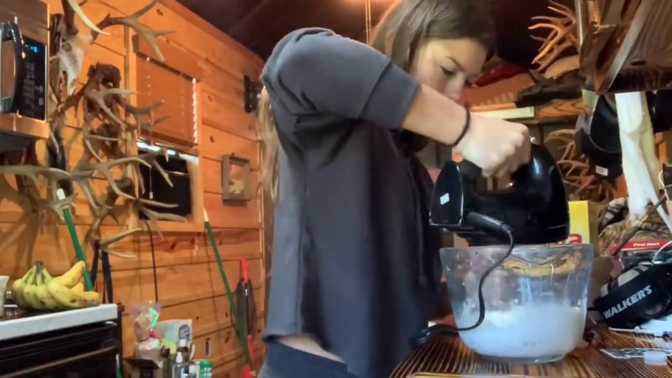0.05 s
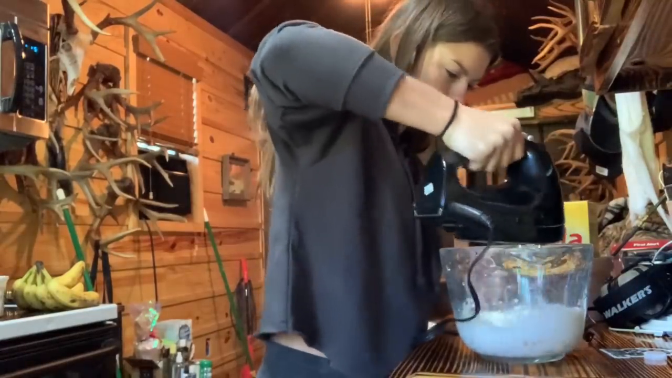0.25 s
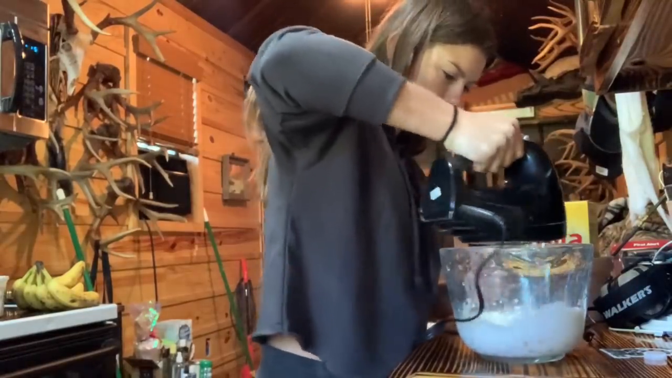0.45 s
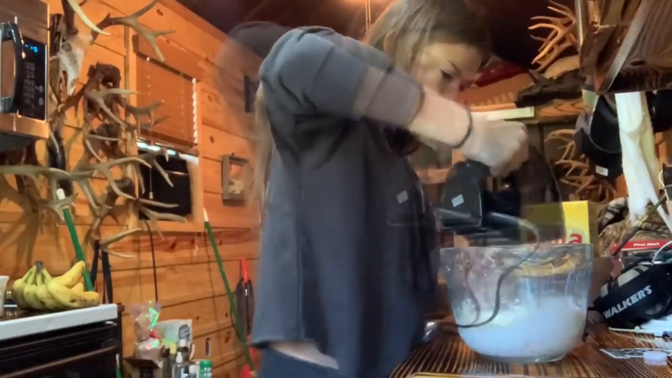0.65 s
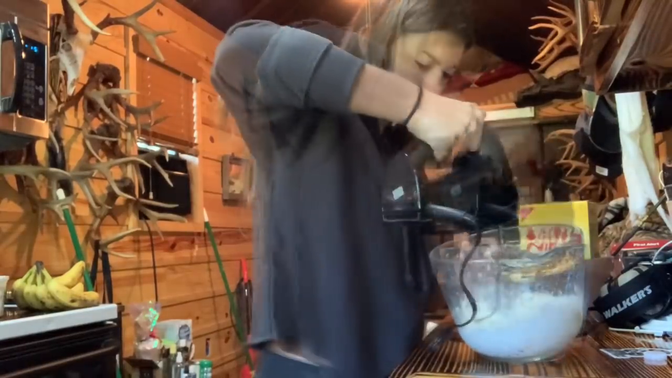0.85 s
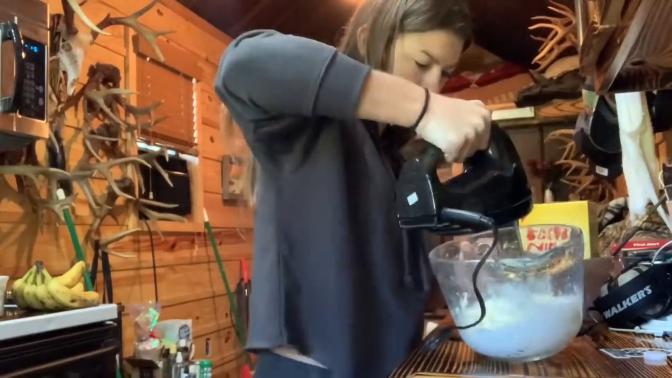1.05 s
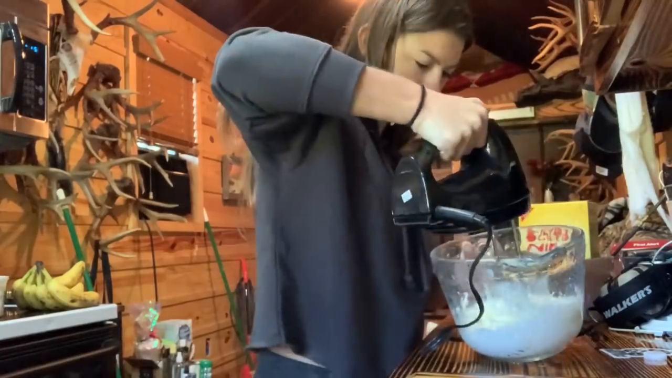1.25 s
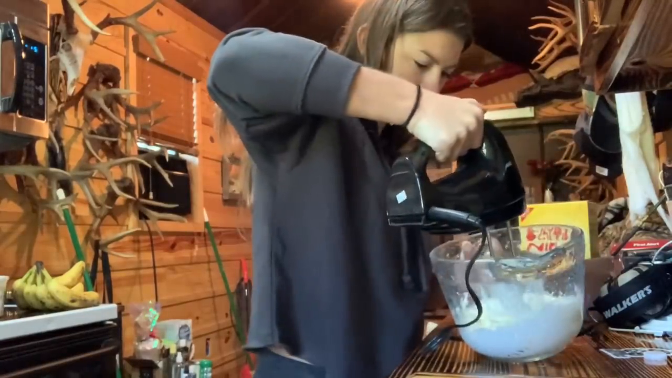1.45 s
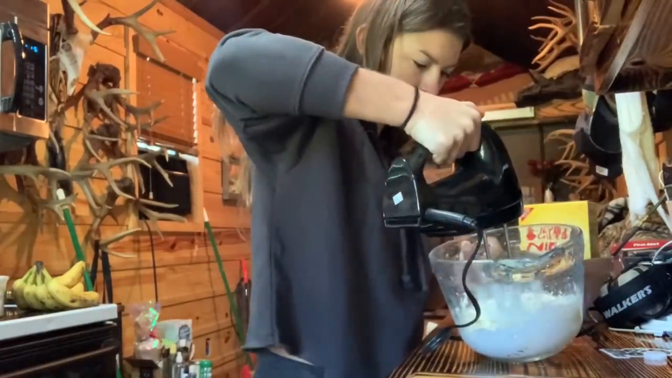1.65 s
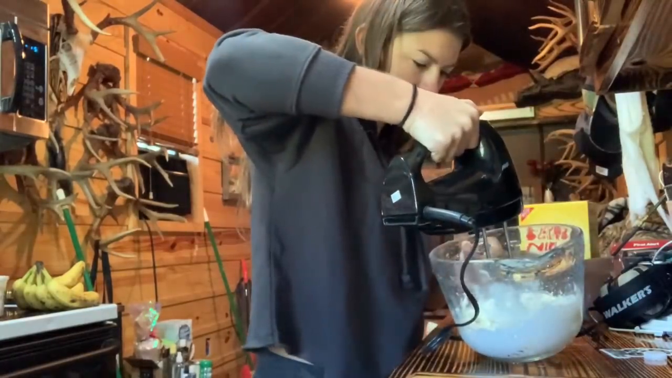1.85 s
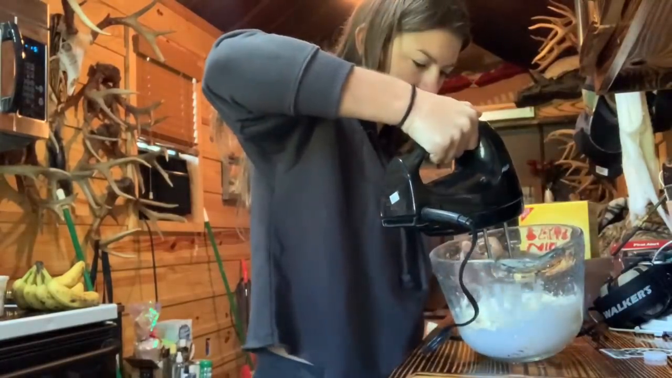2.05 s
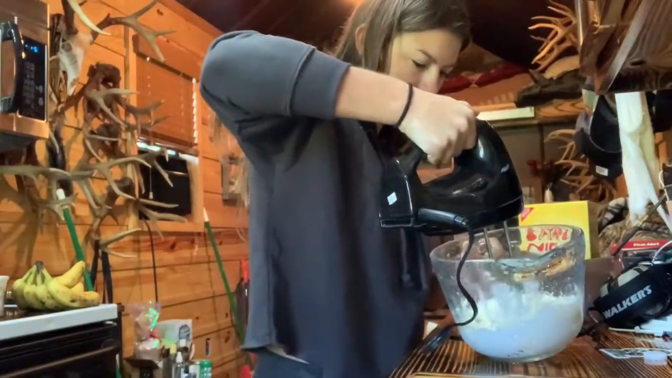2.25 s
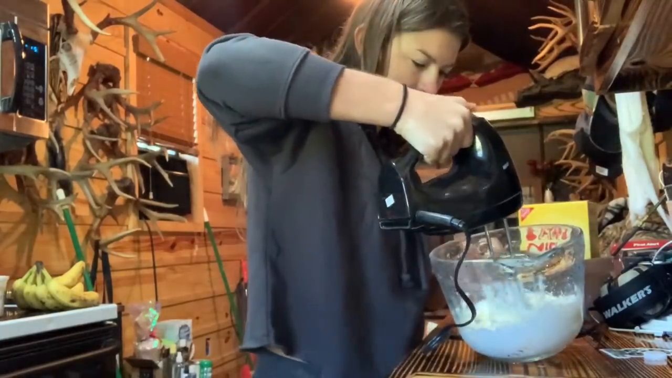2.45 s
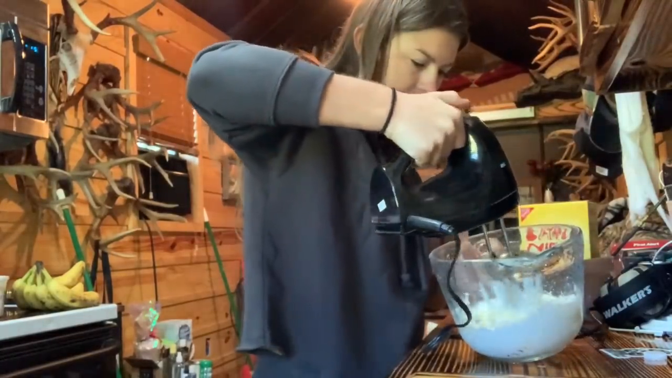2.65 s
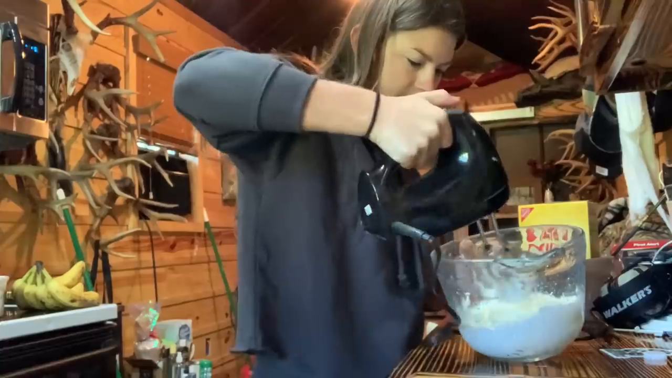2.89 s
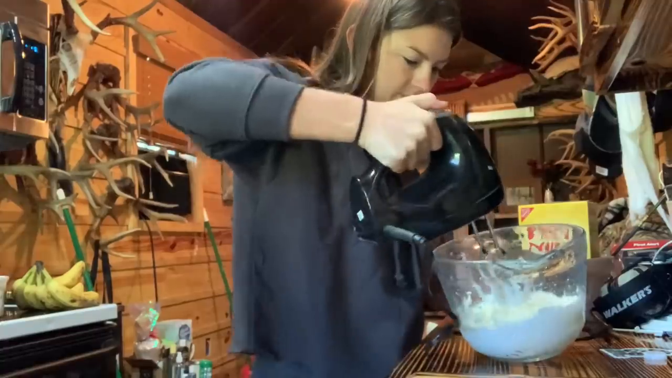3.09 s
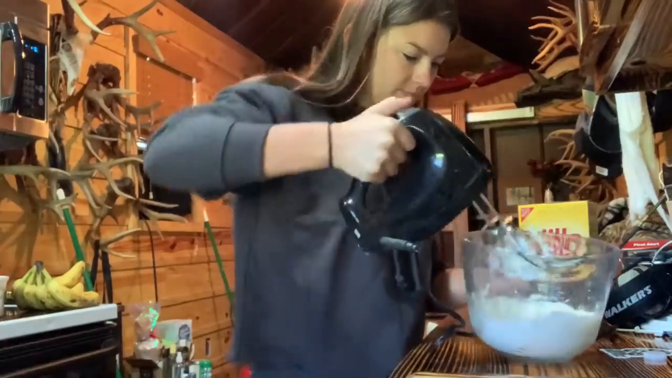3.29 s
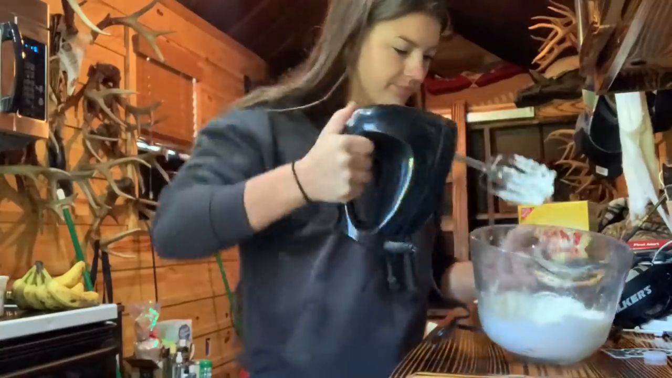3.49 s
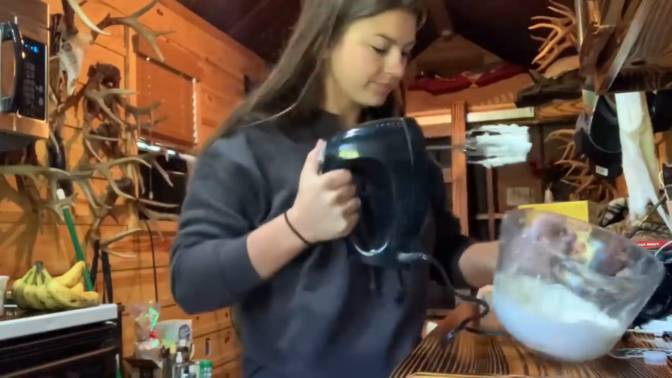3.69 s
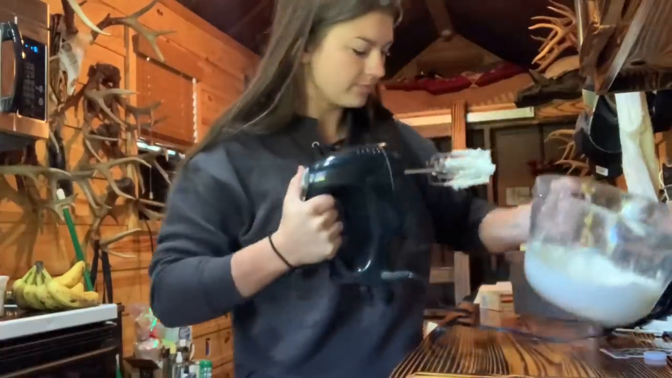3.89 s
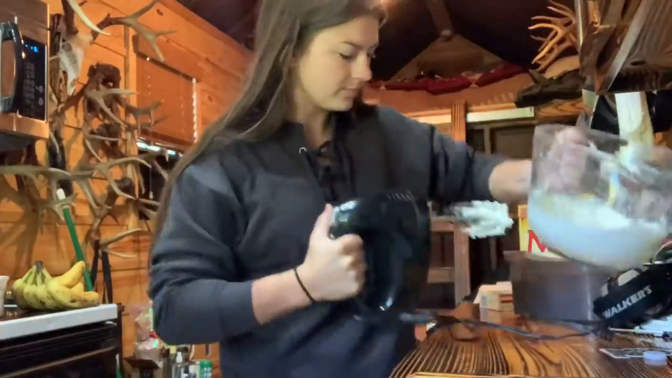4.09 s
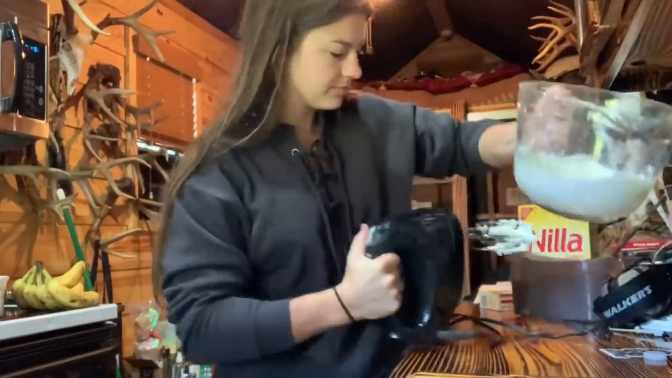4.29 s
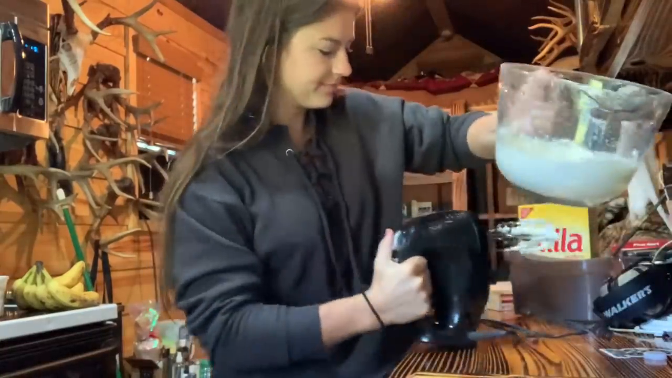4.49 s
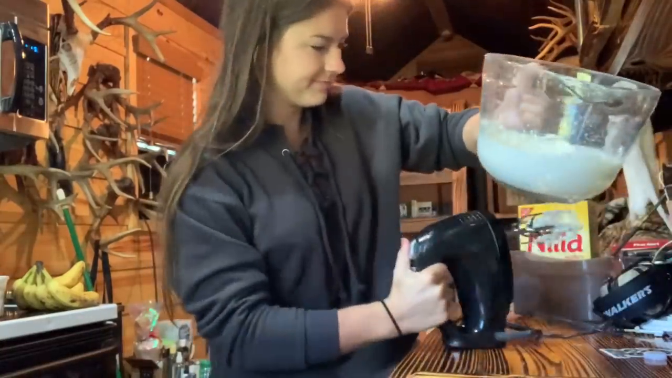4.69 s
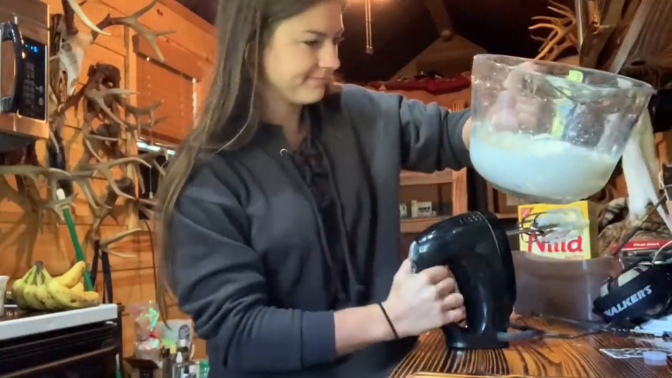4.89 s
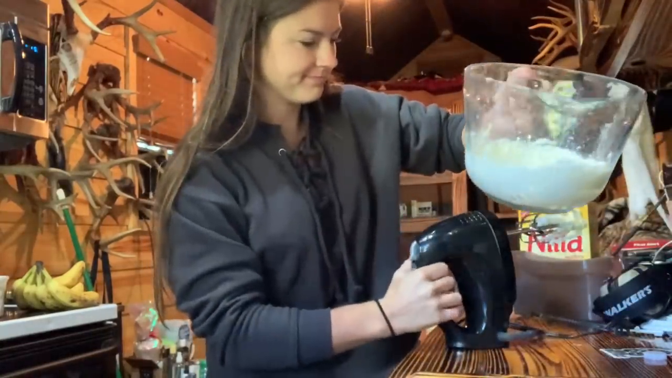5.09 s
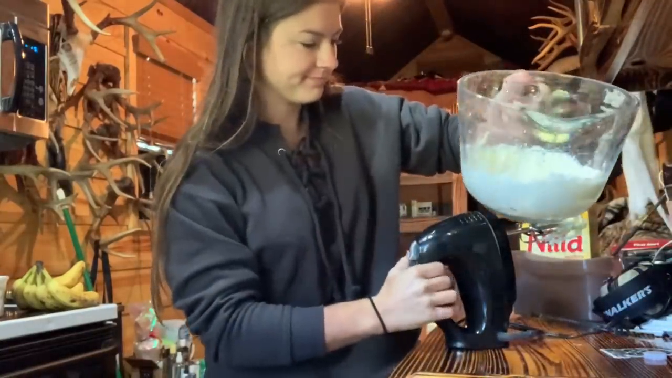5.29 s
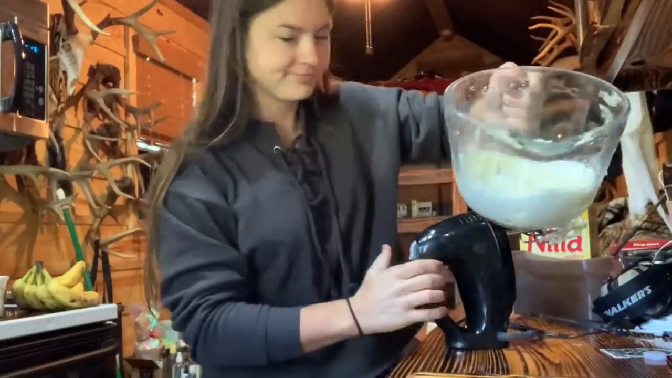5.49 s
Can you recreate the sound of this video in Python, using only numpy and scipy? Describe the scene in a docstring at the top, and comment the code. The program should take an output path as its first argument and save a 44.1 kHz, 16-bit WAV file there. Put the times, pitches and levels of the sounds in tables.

```python
"""An electric hand mixer whips thick cream in a glass bowl on a wooden counter, in a quiet kitchen.
Its motor whines and whirrs while the beaters drum on the bowl. Around 0.7 s they are lifted clear,
chattering on the glass, and then rattle freely. At 1.8 s the motor is switched off and coasts to rest.
From 2.8 s the bowl is knocked and picked up. Last, the mixer is stood on its heel and slid along
the counter until it grips with a low judder, and the bowl clinks faintly."""
import sys
import numpy as np
from scipy import signal
from scipy.fft import rfft, irfft
from scipy.io import wavfile
from scipy.ndimage import uniform_filter1d

SR = 44100
rng = np.random.default_rng(int(sys.argv[2]) if len(sys.argv) > 2 else 0)


def unload_audio(sound):
    """Save the sound as a 16-bit wav file, at the path given as the first command line argument."""
    columns = np.transpose(np.atleast_2d(sound))
    # keep every value between -1 and 1, then stretch to whole-number steps
    steps = np.round(np.clip(columns, -1, 1) * 32767)
    wavfile.write(sys.argv[1], SR, steps.astype(np.int16))


N = 244314
T, HZ = np.arange(N) / SR, np.fft.rfftfreq(N, 1 / SR)
FULL_TURNS_PER_S, SWITCH_OFF_S = 213, 1.835
MAINS_HZ, TOP_HZ = 60, 15900

# the notes of the counter top when hit: (pitch [Hz], relative level [dB], time to fade by 60 dB [s])
COUNTER_NOTES = [(94.7, 5, 0.23), (142.5, 6.5, 0.086), (172.5, -2, 0.183), (245.9, 1, 0.1),
                 (313.6, 0.5, 0.098), (436.4, -5, 0.1247), (477, -3.5, 0.11), (665, -18, 0.14),
                 (945, -12.5, 0.16)]
# where the mixer sits between the two channels: (frequency [Hz], left minus right [dB])
MIXER_PAN = [(400, -2), (2400, -3.5), (5000, 0)]


def amp(db):
    """Turns decibels into a gain."""
    return 10 ** (np.asarray(db) / 20)


def evened(x):
    """Scales a signal to an average (rms) size of 1."""
    return x / np.sqrt(np.mean(x ** 2) + 1e-20)


def read(points, hz):
    """Looks up a table by frequency, on a log scale."""
    f, value = np.transpose(points)
    return np.interp(np.log(hz + 1), np.log(f + 1), value)


def curve(points):
    """Joins (time, value) points with straight lines."""
    return np.interp(T, *np.transpose(points))


def colour(x, spectrum):
    """Filters a signal by a spectrum table, then evens it."""
    return evened(irfft(rfft(x) * amp(read(spectrum, HZ)), N))


def boost(peaks, hz):
    """The gain that a set of resonances gives to this pitch."""
    return amp(sum(db / (1 + (2 * (hz - f) / width) ** 2) for f, width, db in peaks))


def drift(hz):
    """A smooth random wobble, with up to about hz changes a second."""
    coarse = T[::16]
    f = np.fft.rfftfreq(len(coarse), 16 / SR)
    spectrum = rfft(rng.standard_normal(len(coarse))) / (1 + (f / hz) ** 4)
    return evened(np.interp(T, coarse, irfft(spectrum, len(coarse))))


def grains(per_s, spread_db):
    """Scattered clicks of uneven size."""
    clicks = (rng.random(N) < per_s / SR) * rng.choice([-1, 1], N)
    return evened(clicks * amp(spread_db * np.minimum(rng.exponential(1, N), 3)))


def gesture(start_s, length_s, attack_s=.073, release_s=.034):
    """A level that rises, holds and dies away."""
    rise = np.clip((T - start_s) / attack_s, 0, 1)
    return rise * np.exp(-np.maximum(T - start_s - length_s, 0) / release_s)


def add(mix, s, sound):
    """Lays a sound into the mix at s seconds."""
    part = mix[round(s * SR):][:len(sound)]
    part += sound[:len(part)]


def room(x):
    """Echoes from wooden walls; the treble dies sooner than the bass."""
    # how long the room rings: (frequency [Hz], time to fade by 60 dB [s])
    fade_times = [(100, 0.42), (2000, 0.25), (15000, 0.22)]
    echoes = rng.standard_normal((2, SR // 2)) * (rng.random((2, SR // 2)) < .1)
    hz, t, bands = signal.stft(echoes, SR, nperseg=256)
    bands = bands * amp(-60 * t / read(fade_times, hz)[:, None]) * np.minimum(t / .008, 1)
    tail = signal.istft(bands, SR, nperseg=256)[1]
    return signal.fftconvolve(x[None], tail / np.linalg.norm(tail[0]), axes=1)[:, :N]


def stereo(x, pan_db, lead_rad):
    """Direct sound reaches the microphone's left side pan_db louder and lead_rad earlier in phase."""
    half = amp(pan_db / 2) * np.exp(.5j * lead_rad)
    faded = x * signal.windows.tukey(N, .002)
    return irfft(rfft(faded) * np.vstack([half, 1 / half]), N)


def mixer_lead(delay_s=.000263):
    """The mixer's head start on the left, in radians; the delay is shorter in the bass."""
    return 2 * np.pi * HZ * delay_s * np.minimum(HZ / 2400, 1) ** .35


def at_mixer(x):
    """Places a sound at the mixer: part comes straight, part by way of the room."""
    # how alike the two channels are: (frequency [Hz], likeness before clipping [ratio])
    likeness = [(150, -1), (1000, 1.33), (4000, -0.1), (9000, 0.77)]
    direct_share = np.clip(read(likeness, HZ), .05, .995)
    direct = rfft(stereo(x, 0, mixer_lead())) * np.sqrt(direct_share)
    echoes = rfft(room(x)) * np.sqrt(1 - direct_share)
    pan = amp(read(MIXER_PAN, HZ) / 2)
    return irfft((direct + echoes) * np.array([pan, 1 / pan]), N)


def speed(air_drag_s=.605, friction_turns_per_s=68):
    """Motor turns per second: driven until switch-off, then slowed by air and bearings."""
    # the motor under power: (time [s], speed [turns per s])
    driven_speed = [(0, 211), (.2, 213.6), (.39, 220.6), (.45, 220.3), (.55, 215.5), (.7, 212.5),
                    (1.17, 213.5), (1.47, 212.9), (1.54, 205.8), (1.7, 196), (1.85, 192)]
    coasting = np.exp(-np.maximum(T - SWITCH_OFF_S, 0) / air_drag_s)
    return np.maximum((curve(driven_speed) + friction_turns_per_s) * coasting - friction_turns_per_s, 0)


def cream_drag(lifted_s=.64):
    """1 while the thick cream drags on the beaters, 0 once they are lifted."""
    return np.clip((lifted_s - T) / .097, 0, 1)


def slowing(start_s=1.6):
    """0 until start_s, rising to 1 at switch-off."""
    return np.clip((T - start_s) / (SWITCH_OFF_S - start_s), 0, 1)


def motor_level(free_db, in_cream_db, power, mid_lift_s=.71, lift_takes_s=.4):
    """A motor sound grows with speed; in_cream_db is added while the beaters are deep in the cream."""
    depth = np.clip(.5 - (T - mid_lift_s) / lift_takes_s, 0, 1)
    return amp(free_db + in_cream_db * depth) * (speed() / FULL_TURNS_PER_S) ** power


def shaft_angles():
    """The shaft's angle, plain and with its shake in the bearings, which grows under load or slowing."""
    angle = 2 * np.pi * np.cumsum(speed() * (1 + .0005 * drift(25))) / SR
    shake_rad = .006 + .016 * cream_drag() + .042 * slowing()
    return angle, angle + shake_rad * drift(110)


def kitchen(air_db=-65.5):
    """Still air and the faint, wavering hum of an appliance, heard throughout."""
    # the tone of the quiet room: (frequency [Hz], relative level [dB])
    air_spectrum = [(25, -32.5), (60, -7.5), (90, -16.5), (270, -15), (450, -27), (2500, -47), (15000, -52)]
    # the appliance's hum: (pitch [Hz], level [dB])
    hum_notes = [(59.2, -65.5), (274.5, -65)]
    air = colour(rng.standard_normal(N) + .84 * rng.standard_normal((2, N)), air_spectrum)
    hum = sum(amp(db + 1.2 * drift(3.6)) * np.sin(2 * np.pi * hz * T + .3 * drift(3))
              for hz, db in hum_notes)
    return amp(air_db) * air + hum


def motor_whine(angle):
    """Ten fan blades sing, and so do the twelve metal bars that feed current to the spinning rotor."""
    # the fan's whine as the housing is turned: (time [s], relative level [dB])
    fan_levels = [(0, -47), (.13, -37.5), (.27, -40), (.35, -53), (.54, -52), (.59, -36.5), (.75, -45),
                  (1.46, -40), (1.53, -47), (2, -50)]
    # housing resonances that boost a passing whine: (frequency [Hz], width [Hz], boost [dB])
    peaks = [(1412, 240, 19.5), (2130, 64, 3.5), (2323, 84, 6), (2558, 110, 6)]
    hz, powered = speed(), T < SWITCH_OFF_S
    # mains ripple and the slightly off-centre rotor add tones beside the main ones
    ripple = amp(-6) * powered * np.exp(2j * np.pi * 2 * MAINS_HZ * T)
    off_centre = amp(-6) * powered * boost(peaks, 13 * hz) * np.exp(13j * angle)
    fan_gain = amp(curve(fan_levels)) * boost(peaks, 10 * hz) * (hz / FULL_TURNS_PER_S) ** 3
    fan = fan_gain * np.exp(10j * angle) * (1 + ripple / 2)
    bars = boost(peaks, 12 * hz) * np.exp(12j * angle) * (1 + ripple)
    bars = motor_level(free_db=-41, in_cream_db=-17, power=2.3) * (bars + off_centre)
    flutter_db = 1.5 + 2.3 * np.sqrt(slowing())
    fan, bars = (np.sqrt(2) * x.real * amp(flutter_db * drift(22)) for x in (fan, bars))
    return stereo(fan, .67, 2.32) + stereo(bars, -4, -1.94) + amp(-10) * room(fan + bars)


def whistles(table, angle):
    """Fluttering pure tones at multiples of the shaft speed."""
    return np.sqrt(2) * sum(amp(db + 2 * drift(20)) * np.cos(k * angle + 2 * np.pi * rng.random())
                            for k, db in table)


def motor_hum(angle):
    """The unbalanced rotor hums and the motor whistles faintly; more tones join while the cream drags."""
    # the motor's whistles: (pitch [times shaft speed], relative level [dB])
    motor_tones = [(4, -50.5), (5, -49.5), (32, -48), (71, -51)]
    # a low tone and the fan's overtones, while the cream drags: (pitch [times shaft speed], level [dB])
    in_cream_tones = [(2.5, -45), (20, -53), (30, -51), (50, -51)]
    hum = np.sqrt(2) * np.cos(angle) * amp(drift(20))
    sound = motor_level(free_db=-47.5, in_cream_db=-5, power=3.5) * hum
    sound += motor_level(free_db=3.5, in_cream_db=-30, power=5.3) * whistles(motor_tones, angle)
    sound += cream_drag() * whistles(in_cream_tones, angle)
    return stereo(sound, read(MIXER_PAN, HZ), mixer_lead()) + amp(-10) * room(sound)


def motor_whirr(angle):
    """Gears rasp once a turn; the brushes (sliding contacts) scrape and spark at every rotor bar."""
    # the gears' tone through the housing: (frequency [Hz], relative level [dB])
    housing_spectrum = [(100, -26), (220, -5.5), (380, -7), (530, -2.5), (680, -5), (1100, -0.5),
                        (1800, -2), (2600, -6.5), (3200, -11), (4300, -17), (8000, -29)]
    # the brushes' hiss: (frequency [Hz], relative level [dB])
    brush_spectrum = [(1800, -12), (4600, -8.5), (7900, -5.5), (10500, -8), (15500, -5.5)]
    gear_gain = motor_level(free_db=-33, in_cream_db=-2.5, power=1.53)
    brush_gain = motor_level(free_db=-35.5, in_cream_db=.25, power=1.3) * np.tanh(speed() / 18)
    # the same worn surface passes the brushes on every turn
    surface = np.interp(angle / (2 * np.pi), np.arange(512) / 512, rng.standard_normal(512), period=1)
    wear = surface * speed() / FULL_TURNS_PER_S
    rasp = rng.standard_normal(N) + .55 * grains(700, 1)
    gears = colour(rasp * (1 + .23 * np.cos(angle)) + .038 * wear, housing_spectrum)
    buzz = 1 + .2 * (T < SWITCH_OFF_S) * np.cos(2 * np.pi * 2 * MAINS_HZ * T)
    sparks = 1 + .58 * np.cos(12 * angle)
    scrape = rng.standard_normal(N) + .55 * grains(2300, 6)
    brushes = colour(scrape * sparks * buzz * (1 + .23 * np.sin(angle)) + .3 * wear, brush_spectrum)
    return at_mixer(gear_gain * gears + brush_gain * amp(.5 * drift(25)) * brushes)


def bar_ticks(angle, db_per_overtone=-.4863):
    """The bars tick under the brushes; on slowing, their overtones slide through the shell's resonances."""
    # resonances and one dip of the plastic shell: (frequency [Hz], width [Hz], boost [dB])
    shell_peaks = [(2400, 1400, 13.5), (5130, 500, -9), (6750, 260, 9), (7720, 420, 10.5), (11700, 700, 14)]
    bar_hz = 12 * speed()
    phase = 12 * (angle + (.0018 + .006 * slowing()) * drift(110))
    ticks = sum(amp(db_per_overtone * k + 3.5 * drift(20)) * (k * bar_hz < TOP_HZ) * np.cos(k * phase)
                for k in range(2, 22))
    off_centre = 1 + .51 * slowing() * np.cos(angle)
    ticks *= off_centre * motor_level(free_db=-49.5, in_cream_db=-18, power=.96)
    return at_mixer(irfft(rfft(ticks) * boost(shell_peaks, HZ), N))


def struck(notes, contact_ms):
    """The ring after one blow: the spot hit favours some notes, and a soft blow wakes only low ones."""
    t = T[:SR // 2]
    ring = np.zeros(len(t))
    for hz, db, fade_s in notes:
        level = amp(db + 2 * rng.uniform(-1, 1) - 60 * t / fade_s)
        ring += level * np.sin(2 * np.pi * hz * t) / (1 + (hz * contact_ms / 1000) ** 2)
    return ring * (1 - np.exp(-1000 * t / contact_ms))


def beater_drumming(angle, turns_per_blow=3.2):
    """Geared-down blades hit the bowl unevenly and churn the cream; the counter carries the thuds."""
    # the filled bowl's note: (pitch [Hz], relative level [dB], time to fade by 60 dB undamped [s])
    bowl_note = [(516, -10.5, 0.28)]
    # the beaters lean on the bowl: (start [s], length [s], relative level [dB])
    leans = [(0.038, 0.22, -33.5), (0.29, 0.26, -34.5), (0.57, 0.23, -40)]
    # a blade strikes the bowl: (time [s], peak level [dB], contact time [ms])
    strikes = [(.144, -23, 2.3), (.173, -25, 2.3), (.216, -20.5, 0.89), (.240, -18, 0.92), (.307, -23, 1.6),
               (.364, -28, 2), (0.385, -27, 12), (0.418, -19, 1.1), (0.469, -18.5, 1.4), (0.508, -22, 1.3),
               (.533, -25, 2.7), (.591, -26.5, 6), (.704, -29, 1.7)]
    notes, damping = COUNTER_NOTES + bowl_note, np.exp(-T[:SR // 2] / .048)
    blows = np.diff(np.floor(angle / (2 * np.pi * turns_per_blow) + drift(60) / 2), prepend=0) != 0
    blows = blows * amp(3 * np.clip(rng.standard_normal(N), -2, 1)) * rng.choice([-1, 1], N)
    churn = rng.standard_normal(N)
    brighten = np.hypot(1, np.minimum(HZ, 550) / 260)  # wire on glass is a hard contact
    force = irfft(rfft(blows / blows[:SR].std() + churn) * brighten, N)
    thuds = signal.fftconvolve(force, struck(notes, contact_ms=.99) * damping)[:N]
    pressure = np.max([amp(db - 1) * gesture(s, length, .033, .051) for s, length, db in leans], 0)
    drum = thuds / np.sqrt(uniform_filter1d(thuds ** 2, SR // 8) + 1e-12) * pressure
    for s, db, contact_ms in strikes:
        ring = np.gradient(struck(notes, contact_ms) * damping)
        add(drum, s, amp(db) * ring / abs(ring).max())
    return stereo(drum, -4, .45) + amp(-17.5) * room(drum)


def gear_strain(angle, level_db=-36):
    """The gears sing louder as the beaters are pushed into the cream, and stop as they are drawn up."""
    teeth = np.sqrt(2) * np.cos(25 / 3 * angle) * amp(drift(20))
    push = gesture(start_s=.14, length_s=.38, attack_s=.25, release_s=.028)
    return stereo(amp(level_db) * push * teeth, -4.5, 2.1)


def wire_chatter(angle, ring_hz=5680, fade_s=.055, turns_per_ping=9, level_db=-38.5):
    """On the way up a beater chatters against the glass and its wire rings."""
    pings = np.diff(np.floor(angle / (2 * np.pi * turns_per_ping) + .1 * drift(21)), prepend=0)
    pings *= gesture(start_s=.5, length_s=.32, attack_s=.014, release_s=.03)
    t = T[:SR // 4]
    ring = amp(level_db - 60 * t / fade_s) * np.sin(2 * np.pi * ring_hz * t)
    return stereo(signal.fftconvolve(pings, ring)[:N], 0, .9)


def socket_rattle(ring_hz=3700, fade_s=.02, ticks_per_s=330):
    """The steel beaters rattle and ring in their sockets, louder once free of the cream."""
    t = T[:SR // 20]
    ring = np.sin(2 * np.pi * ring_hz * t) * amp(-60 * t / fade_s)
    rattle = evened(signal.fftconvolve(grains(ticks_per_s, 3.2), ring)[:N])
    return at_mixer(rattle * motor_level(free_db=-47, in_cream_db=-14, power=2))


def clack(level_db, tilt_db, fade_s=.07, rise_s=.00028):
    """One tap on plastic and glass: a short, hollow burst of noise."""
    # resonances of the hollow plastic body: (frequency [Hz], width [Hz], boost [dB])
    body_peaks = [(738, 32, 8), (1080, 42, -5), (2470, 120, 4.5), (3260, 1300, 6)]
    t = T[:SR // 2]
    hz = np.fft.rfftfreq(len(t), 1 / SR)
    tone_db = read([(150, -20.5), (500, -1.5), (1500, -1), (3300, -14), (6000, -16.5), (15000, -38.5)], hz)
    tone = boost(body_peaks, hz) * amp(tone_db + tilt_db * np.log2(hz / 1000 + .1))
    crack = evened(irfft(rfft(rng.standard_normal(len(t))) * tone, len(t)))
    return amp(level_db - 60 * t / fade_s) * crack * (1 - np.exp(-t / rise_s))


def knocks(clack_boost_db=1):
    """Each blow rings the counter and clacks in plastic and glass; clicks in the hand only clack."""
    # light clicks of plastic, wire and glass: (time [s], relative level [dB], tilt [dB per octave])
    clicks = [(2.804, -52, -5.5), (2.811, -57, -5), (2.897, -54, -6.5), (2.914, -59, -8.5),
              (3.652, -50, -5.5), (3.789, -50.5, -5), (3.802, -48.5, -7), (4.027, -50.5, -1),
              (4.136, -44.5, -1), (4.702, -67, 7)]
    # bowl and mixer knock on the counter:
    # (time [s], relative thud level [dB], contact [ms], relative clack level [dB], tilt [dB per octave])
    blows = [(3.172, -41, 1.25, -50.5, -4), (3.199, -41, 0.22, -48, -12.5), (3.212, -41.5, 0.84, -59, -10),
             (3.333, -49, 2.6, -56, -9.5), (3.569, -37.5, 3.47, -59.5, -10.5),
             (4.304, -39, 0.64, -45.5, 6.5), (4.319, -29, 2.4, -40, -11), (4.402, -29.5, 2.5, -35.5, -7.5),
             (4.426, -26.5, 1.76, -42.5, -0.5)]
    thuds, clacks = np.zeros((2, N))
    for s, thud_db, contact_ms, clack_db, tilt_db in blows:
        add(thuds, s, amp(thud_db) * struck(COUNTER_NOTES, contact_ms))
        add(clacks, s, clack(clack_db + clack_boost_db, tilt_db))
    for s, clack_db, tilt_db in clicks:
        add(clacks, s, clack(clack_db + clack_boost_db, tilt_db, fade_s=.11, rise_s=.0015))
    return stereo(thuds, -4.5, .26) + amp(-15) * room(thuds) + stereo(clacks, -5.5, 1) + room(clacks)


def rubbing():
    """Cloth rustles, and the mixer's heel drags in tiny slips that shake the counter."""
    # sleeve, bowl and heel rub: (start [s], length [s], relative rustle level [dB], shudder level [dB])
    strokes = [(3.086, 0.16, -72, -45.5), (3.264, 0.18, -79, -56.5), (3.823, 0.15, -55.5, -69),
               (4.085, 0.15, -62.5, -64), (4.444, 0.25, -53, -42.5), (5.406, 0.103, -67, -92)]
    # the tone of the rustle: (frequency [Hz], relative level [dB])
    rustle_spectrum = [(200, -7), (450, -3.5), (850, -3), (1200, -8.5), (2000, -18.5), (3500, -22),
                       (4600, -36), (15000, -55)]
    rustle = sum(amp(db) * gesture(s, length) for s, length, db, _ in strokes)
    shudder = sum(amp(db) * gesture(s, length) for s, length, _, db in strokes)
    catches = amp(3 * drift(55))
    rustle *= catches * colour(rng.standard_normal(N) + .75 * grains(360, 3), rustle_spectrum)
    shudder *= colour(rng.standard_normal(N), [(60, -3), (160, -2.5), (400, -13.5), (1500, -62.5)])
    return amp(-4) * (rustle + room(rustle)) + stereo(shudder, -4, .4)


def heel_hiss(level_db=-70):
    """The plastic heel hisses thinly as it slides over the varnish."""
    hiss = colour(grains(2700, 4.4), [(2000, -18), (7000, -5), (15000, -17)])
    hiss *= amp(level_db) * gesture(start_s=4.45, length_s=.26)
    return hiss + room(hiss)


def heel_judder(peak_s=4.704, pitch_hz=150, level_db=-27, build_s=.0115, release_s=.012):
    """At the end of its slide the heel grips: a low judder builds up and stops."""
    swell = np.exp(np.minimum((T - peak_s) / build_s, (peak_s - T) / release_s))
    return stereo(amp(level_db) * swell * np.sin(2 * np.pi * pitch_hz * T), -3.5, .31)


def bowl_clink(lower_hz=3050, upper_hz=3400, fade_s=.045):
    """The glass bowl rings faintly with two notes as it is shifted in the hand."""
    # the bowl is shifted: (time [s], level [dB])
    shifts = [(4.678, -50)]
    t, ring = T[:SR // 4], np.zeros(N)
    notes = np.sin(2 * np.pi * lower_hz * t) + .5 * np.sin(2 * np.pi * upper_hz * t)
    for s, db in shifts:
        add(ring, s, amp(db - 60 * t / fade_s) * notes)
    return stereo(ring, 0, 0)


def scene():
    """The running mixer, the handling that follows, and the quiet kitchen behind both."""
    angle, shaky_angle = shaft_angles()
    tones = motor_whine(shaky_angle) + gear_strain(shaky_angle) + motor_hum(shaky_angle)
    motor = tones + motor_whirr(angle) + bar_ticks(angle)
    handling = knocks() + rubbing() + heel_hiss() + heel_judder() + bowl_clink()
    beaters = beater_drumming(angle) + wire_chatter(angle) + socket_rattle()
    return motor + beaters + handling + kitchen()


def record(dry, low_hz=58):
    """The microphone loses the deep bass and the very highest treble."""
    thin = signal.sosfilt(signal.butter(4, low_hz, "highpass", fs=SR, output="sos"), dry)
    treble_cut = signal.firwin(511, TOP_HZ, window=("kaiser", 9), fs=SR)
    return signal.oaconvolve(thin, treble_cut[None], "same")


dry = scene()
out = record(dry)
unload_audio(out)
```